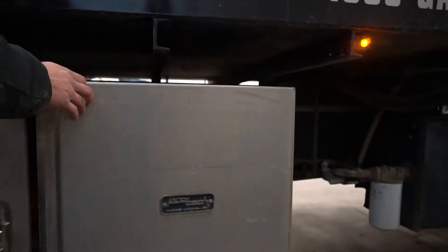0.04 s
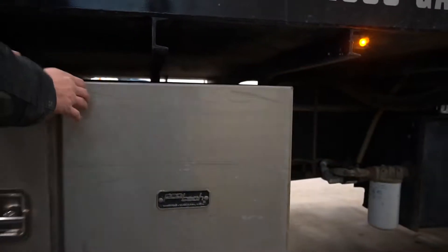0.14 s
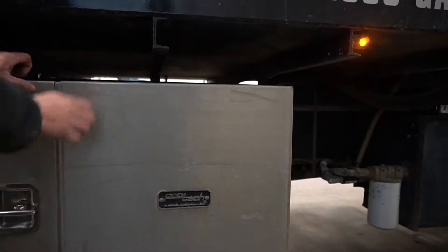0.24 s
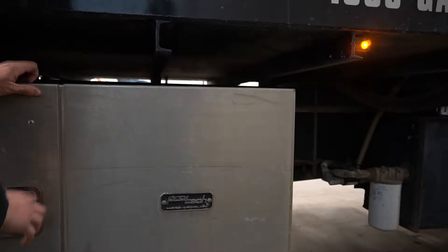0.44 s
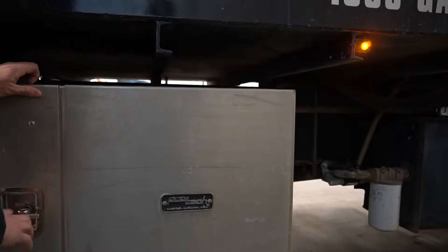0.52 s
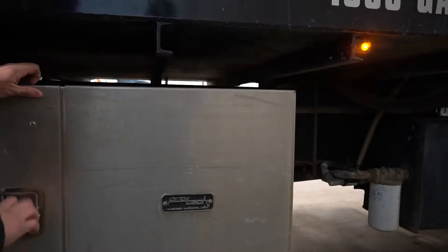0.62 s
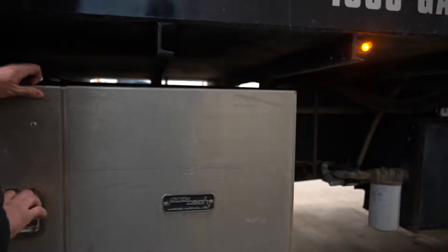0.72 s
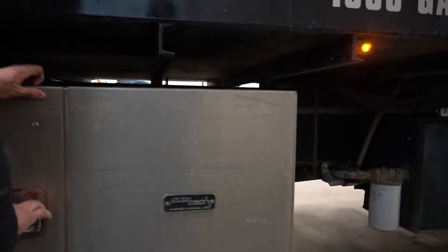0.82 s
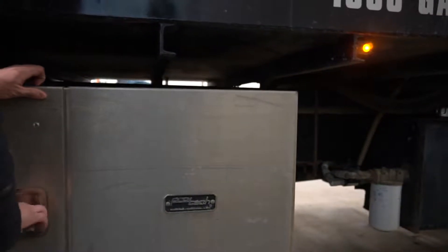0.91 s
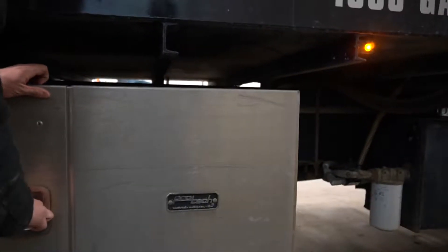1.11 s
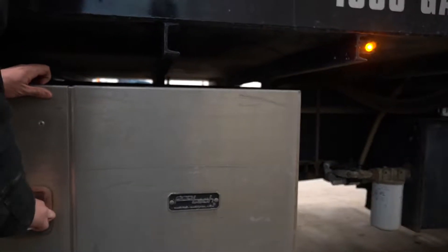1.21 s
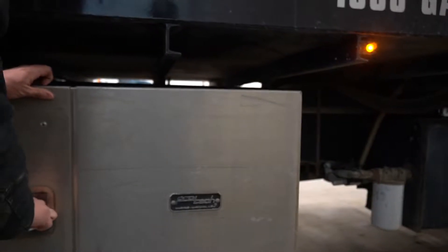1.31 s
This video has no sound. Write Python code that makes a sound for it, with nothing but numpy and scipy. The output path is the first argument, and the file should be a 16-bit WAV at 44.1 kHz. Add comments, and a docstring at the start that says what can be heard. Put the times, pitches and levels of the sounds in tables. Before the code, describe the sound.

A metal compartment door rattles and slams shut with a shuddering clang, then its latch clicks

```python
"""A sheet-metal locker door is swung shut in a large shed with quiet air. Damped noise from random contacts
makes its fittings rattle, short noise bursts make the handle tick, and the edge touches dully on struck modes.
The door then slams and shudders, driving panel and box resonances, and the shed answers with diffuse decay.
Last the latch is turned home: filtered grit scrapes, struck modes knock, contacts chatter,
and an unsteady tone squeaks along with a few more ticks, the last one the strongest."""
import sys
import numpy as np
from scipy import signal
from scipy.fft import rfft, irfft
from scipy.io import wavfile

SR = 44100
rng = np.random.default_rng(int(sys.argv[2]) if len(sys.argv) > 2 else 0)


def dump_mix(stems):
    """Bounce the given channels to the path in sys.argv[1] as a 16-bit WAV at rate SR."""
    frames = np.atleast_2d(stems).T  # one column per channel
    limited = np.clip(frames, -1, 1)  # hard clip at full scale
    pcm = np.round(limited * 32767).astype(np.int16)
    wavfile.write(sys.argv[1], SR, pcm)


def volts(x):
    """Linear amplitude factor 10**(x/20) for a level x in dB, scalar or array-like."""
    e = np.asarray(x, float) / 20
    return 10 ** e


N = 59535
T = np.arange(N) / SR   # time in s

# All levels and spectra below are relative.
# Correlation of left and right in diffuse noise: frequency_hz, correlation
CORRELATION = [(60, 0.96), (180, 0.99), (550, 0.92), (1650, 0.54), (4970, 0.25), (15000, 0.18)]
CONTACT_POINTS = 6   # spots on the metal that are struck at random

# Spectrum of the quiet air: frequency_hz, density_db_per_hz
AIR_SPECTRUM = [(18, -53), (30, -28), (931, 7), (1210, 0.5), (2520, 7), (2950, -10), (3540, 1), (7580, -19),
                (13900, -20), (15800, -43)]
AIR_DB = -53

# Level of the loose parts while the door swings: time_s, level_db
RATTLE_LEVEL = [(0, -34), (.014, -39.5), (.035, -36), (.06, -40.5), (.066, -33.5), (.08, -31.5),
                (.089, -27.5), (.1, -35), (.127, -32.5), (.145, -32), (.18, -33), (.215, -36.5),
                (.24, -36.5)]
# Spectrum of the loose parts: frequency_hz, density_db_per_hz
RATTLE_SPECTRUM = [(88, -66), (150, -40), (186, -20), (308, -33), (464, -7.5), (919, -6.5), (1330, -3),
                   (2040, -6.5), (3960, -1), (15800, -4)]
RATTLE_PER_S = 3000

# Decay of the shed: frequency_hz, t60_s
SHED_T60 = [(60, 1.8), (160, 0.83), (420, 0.72), (1100, 1.07), (2910, 1.22), (7680, 0.62)]
# Spectrum of the shed: frequency_hz, density_db_per_hz
SHED_SPECTRUM = [(40, -11), (150, 2), (500, -5.5), (1200, 0), (2500, 3.5), (4500, 4), (7000, 4.5),
                 (15000, -11.5)]
DOOR_SEND_DB, LATCH_SEND_DB = -7.5, -10
SHED_BUILD_S = 0.031   # time constant of the build-up
CROSSFADE_S = 0.03002   # time for the send to crossfade between reverb paths

# Bright metal ticks of handle and catch: start_s, level_db, low_hz, high_hz, t60_s, left_minus_right_db
TICKS = [(0.015, -17, 4800, 8800, 0.054, 8.5), (0.0647, -17, 4430, 10760, 0.048, 7.5),
         (.1400, -17, 8900, 15700, 0.052, 5), (.1963, -23, 8000, 16600, 0.027, 3),
         (0.244, -10, 2500, 11550, 0.03, 8), (.2712, -9.5, 3530, 14200, 0.11, 4.5),
         (0.328, -19.5, 3700, 13000, 0.099, 5), (0.3802, -8, 3540, 15000, 0.031, 6),
         (1.018, -55, 6100, 15000, 0.099, 8), (1.052, -41.5, 4000, 11100, 0.028, 10),
         (1.106, -47, 6020, 14400, 0.065, 12), (1.117, -45, 6000, 13800, 0.081, 2),
         (1.1947, -26, 3220, 14900, .04, 5)]
TICK_DB, TICK_RISE_S = -9, 0.00063
SNAP_DB, SNAP_T60_S = 2.5, 0.0067   # the sharp onset, over the burst

# First touches of the door edge: start_s, level_db
TOUCHES = [(0.2171, -16), (0.2231, -29), (.227, -25), (0.2316, -23.5)]
# Spectrum of the touched edge: frequency_hz, density_db_per_hz
TOUCH_SPECTRUM = [(24, -35), (40, -1), (367, -14), (611, -4), (974, -2), (1890, 4), (2700, 5), (3600, -39),
                  (3940, -8), (8000, -28), (10400, -58), (17600, -120)]
# Modes struck by the edge: frequency_hz, level_db, t60_s
TOUCH_MODES = [(115, -9.5, 0.089), (201, -4, 0.034), (292, -8, 0.048), (576, -4, 0.042), (940, -13, .02),
               (1890, 3, .012), (2700, 0.5, 0.011)]
TOUCH_T60_S, TOUCH_BODY_DB = 0.11, 15
TOUCH_DULLING = 395   # dB per s per kHz

# Hardest blows of the door on its frame: start_s, level_db
BLOWS = [(0.2419, -2), (0.2722, -5.5), (.294, -11), (.312, -2.5), (0.331, -1.5), (.344, -4), (0.3807, -5),
         (0.409, -10)]
# Shudder of the door in its frame: time_s, level_db, treble_change_db
SHUDDER = [(.242, -17, 3.5), (.258, -19, 4.5), (.269, -22.5, 1), (.274, -16, 0.5), (.3, -17, 1),
           (.336, -17.5, 0.5), (.376, -20.5, -5.5), (.385, -20, 6.5), (.42, -21.5, -2.5), (.46, -31, 0),
           (.52, -39.5, -8)]
SLAM_S, SHUDDER_END_S, SHUDDER_PER_S = 0.2422, 0.56, 1500
TREBLE_HZ = 5500   # the treble change acts above this
# Spectrum of the dense panel modes: frequency_hz, density_db_per_hz
DOOR_SPECTRUM = [(18, -71), (30, -43), (69, -46), (309, -10), (372, -14), (662, -2.5), (1090, -9),
                 (1420, -5), (2270, -8), (4260, -6.5), (7010, -15.5), (14600, -24.5), (15800, -25)]
# Decay of the dense panel modes: frequency_hz, t60_s
DOOR_T60 = [(40, .3), (150, 0.23), (600, 0.18), (2000, 0.096), (6000, 0.079), (15000, 0.025)]
# Strongest single panel modes: frequency_hz, level_db
DOOR_MODES = [(678.3, -35), (1744, -51), (1981, -25), (2702, -27), (2929, -66), (3278, -62), (3451, -54),
              (3736, -51), (3801, -54), (3941, -28), (4221, -41), (4398, -38), (4538, -30), (5028, -34)]
MODE_T60_S, MODES_DB = 0.2, -14
# Low modes of the box: frequency_hz, level_db, t60_s
BOX_MODES = [(98.7, -52, 0.54), (129, -57, 0.48), (157, -48.5, 1), (203, -42, 0.22), (256.3, -42.5, 0.32),
             (314.2, -37.5, 0.31), (456.2, -37, 0.38), (584, -30, 0.11)]

# Level of the scraping handle: time_s, level_db
SCRAPE_LEVEL = [(1.0, -84), (1.05, -61), (1.13, -71), (1.17, -51.5), (1.19, -54), (1.2, -41.5),
                (1.23, -48.5), (1.26, -59), (1.3, -73)]
# Spectrum of the scraping handle: frequency_hz, density_db_per_hz
SCRAPE_SPECTRUM = [(2000, -26), (3000, -7), (4000, -0.5), (5500, -2.5), (7000, -13.5), (15800, -15)]
SCRAPE_PER_S = 2400

# Level of the latch bar's chatter between its knocks: time_s, level_db
CHATTER_LEVEL = [(1.05, -33), (1.07, -36.5), (1.11, -42.5), (1.14, -49.5), (1.17, -51)]
# Spectrum of the chatter: frequency_hz, density_db_per_hz
CHATTER_SPECTRUM = [(150, -47), (300, -15), (620, -0.5), (1000, -15), (1300, -9.5), (1850, -7),
                    (2440, -10.5), (4200, -13.5), (5500, -30.5), (9000, -42), (15000, -55)]
CHATTER_PER_S = 1800

# Knocks of the latch bar going home: start_s, level_db
KNOCKS = [(1.0505, -26.5), (1.056, -39), (1.0653, -24.5), (1.076, -26), (1.088, -25), (1.096, -33),
          (1.106, -23.5), (1.12, -38), (1.134, -33.5)]
# Modes of the latch bar: frequency_hz, level_db, t60_s
LATCH_MODES = [(111, -41, 0.085), (164, -19, 0.12), (360, -47, 0.11), (400, -14, 0.085), (465, -20, 0.13),
               (542, -13.5, 0.12), (626.4, 1.5, 0.084), (700, -9, .06), (917, -6, 0.041), (1218, -9, .04),
               (1510, -8, 0.052), (1856, -5, 0.047), (2420, -1.5, 0.056), (2789, -11, 0.048)]
# Spectrum of the dense door modes behind the latch: frequency_hz, density_db_per_hz
LATCH_SPECTRUM = [(35, -56), (60, -41), (396, -13), (488, -28), (628, 2), (842, -2), (1550, -10),
                  (2070, -23), (2400, -8), (3090, -24), (9000, -56), (11700, -80), (19800, -120)]
# Decay of the chatter and of the door behind the latch: frequency_hz, t60_s
LATCH_T60 = [(100, .08), (600, 0.051), (2000, 0.039), (6000, 0.021)]
LATCH_BODY_DB = 4.5
KNOCK_DULLING = 59   # dB per s per kHz
SOFT_HZ, KNOCK_LOW_HZ = 2500, 220   # low-pass of every modal knock, high-pass of the bar

# Squeak of the handle: time_s, level_db, overtone_level_db
SQUEAK = [(1.12, -69, -80), (1.135, -74, -61), (1.15, -51, -61), (1.16, -48, -65), (1.193, -45.5, -60),
          (1.198, -70, -58), (1.25, -64, -58), (1.31, -69, -65)]
SQUEAK_HZ, OVERTONE_HZ = 1352, 2750
SQUEAK_WAVER_RAD = 0.23   # rms phase wander of the lower tone

LOW_CUT_HZ, MONO_BELOW_HZ, CUTOFF_HZ = 136, 430, 16450


def rms_one(x):
    """Normalization to unit root-mean-square value."""
    return x / np.sqrt(np.mean(x ** 2) + 1e-20)


def filtered(x, order, hz, kind="low"):
    """Butterworth filtering: maximally flat in the passband."""
    return signal.sosfilt(signal.butter(order, hz, kind, fs=SR, output="sos"), x)


def in_time(rows, column=1):
    """Amplitude envelope whose level runs linearly in dB between the rows."""
    rows = np.array(rows)
    return volts(np.interp(T, rows[:, 0], rows[:, column]))


def at_hz(points, hz):
    """Interpolation along logarithmic frequency."""
    points = np.array(points)
    return np.interp(np.log(hz), np.log(points[:, 0]), points[:, 1])


def bands(spectrum, t60, more_correlation=0.0, size=N):
    """High modal density: stereo noise decaying in third-octave bands, at unit energy per channel on average."""
    out = 0
    hz = np.maximum(np.fft.rfftfreq(size, 1 / SR), 1)
    noise = rfft(rng.standard_normal((2, size))) * volts(at_hz(spectrum, hz))
    for centre in 30 * 2 ** np.arange(0, 9.2, 1 / 3):
        distance = np.clip(np.log2(hz / centre) * 3, -1, 1)
        mid, side = irfft(noise * np.cos(distance * np.pi / 2) ** 2, size)
        alike = np.clip(at_hz(CORRELATION, centre) + more_correlation, 0, 1)
        pair = np.sqrt(1 + alike) * mid + np.sqrt(1 - alike) * side * [[1], [-1]]
        out = out + pair * volts(-60 * T[:size] / at_hz(t60, centre))
    return rms_one(out) / np.sqrt(size)


def through(x, response):
    """Linear superposition: convolution of an excitation with an impulse response."""
    return signal.fftconvolve(np.atleast_2d(x), response, axes=1)[:, :N]


def ring(clicks, hz, t60):
    """Damped resonator: a unit click starts a decaying sine of initial height 1."""
    radius = 1000 ** (-1 / (t60 * SR))
    turn = 2 * np.pi * hz / SR
    return signal.lfilter([0, np.sin(turn)], [1, -2 * radius * np.cos(turn), radius ** 2], clicks + 1e-18)


def clicks_at(events, gain_db):
    """Impulsive excitation: one click per event."""
    clicks = np.zeros(N)
    for s, db in events:
        clicks[int(s * SR)] = volts(db + gain_db)
    return clicks


def contacts(per_s, spread_db):
    """Random impacts of uneven size and either sign, at rms 1."""
    size = volts(spread_db * np.minimum(rng.exponential(1, N), 4))
    sign = rng.choice([-1, 1], N)
    return rms_one(size * sign * (rng.random(N) < per_s / SR))


def scattered(drive, spectrum, t60, size):
    """Position-dependent excitation: each contact point stirs the modes in its own way."""
    point = rng.integers(0, CONTACT_POINTS, N)
    return sum(through(drive * (point == k), bands(spectrum, t60, size=size)) for k in range(CONTACT_POINTS))


def knocks(events, modes, dulling, spread_db):
    """Modal superposition: soft blows excite each mode by chance strengths, later ones with less treble."""
    s, db = np.transpose(events)
    chance = rng.normal(0, spread_db, (len(s), len(modes)))
    out = 0
    for k, (hz, level_db, t60) in enumerate(modes):
        loss_db = dulling * (s - s[0]) * hz / 1000
        clicks = np.zeros(N)
        clicks[(s * SR).astype(int)] = volts(db + level_db - loss_db + chance[:, k])
        out = out + ring(clicks, hz, t60)
    return filtered(out, 2, SOFT_HZ)


def air():
    """Stationary background noise: bands whose decay is too slow to notice."""
    return volts(AIR_DB) * np.sqrt(N) * bands(AIR_SPECTRUM, [(30, 1e6), (15000, 1e6)])


def rattle():
    """Repeated impact: loose fittings chatter on small, quickly damped metal."""
    drive = contacts(RATTLE_PER_S, spread_db=3.0) * in_time(RATTLE_LEVEL) * (T < SLAM_S)
    metal = scattered(drive, RATTLE_SPECTRUM, [(200, 0.05), (15000, 0.014)], size=4096)
    return metal * volts([[0.8], [-0.8]])


def shed(x):
    """Diffuse reverberation: the sound is shared in turn among three noise tails, for a smooth decay."""
    turn = np.pi * T / (3 * CROSSFADE_S)
    out = 0
    for k in range(3):
        path = bands(SHED_SPECTRUM, SHED_T60) * (1 - np.exp(-T / SHED_BUILD_S))
        share = np.sqrt(2 / 3) * np.cos(turn + k * np.pi / 3)   # the squared shares sum to 1
        out = out + through(x * share, path)
    return out


def ticks():
    """Transient radiation: each tick is a band of noise with a sharp snap and a short exponential decay."""
    out = np.zeros((2, N))
    for s, db, low_hz, high_hz, t60, pan_db in TICKS:
        noise = rng.standard_normal((2, N))
        burst = filtered(noise[0] + 1.17 * noise[1] * [[1], [-1]], 2, [low_hz, high_hz], "band")
        age = np.maximum(T - s, 0)
        decay = volts(-60 * age / t60) + volts(SNAP_DB - 60 * age / SNAP_T60_S)
        shape = (1 - np.exp(-age / TICK_RISE_S)) * decay
        out += volts(db + TICK_DB + pan_db * np.array([[0.5], [-0.5]])) * rms_one(burst) * shape
    return out


def touches():
    """Soft impact: the door edge knocks dully on its seal, exciting dense and single modes."""
    t60 = [(60, 2 * TOUCH_T60_S), (700, TOUCH_T60_S), (2000, 0.016)]
    body = through(clicks_at(TOUCHES, TOUCH_BODY_DB), bands(TOUCH_SPECTRUM, t60, more_correlation=0.22))
    return body + volts(-5.5) * knocks(TOUCHES, TOUCH_MODES, TOUCH_DULLING, spread_db=2.0)


def slam():
    """Forced resonance: blows and dense contacts drive the panel's dense and strongest modes and the box."""
    drive = contacts(SHUDDER_PER_S, spread_db=1.5) * in_time(SHUDDER) * (T > SLAM_S) * (T < SHUDDER_END_S)
    for s, db in BLOWS:
        drive[int(s * SR)] += volts(db + 9.5)
    lines = sum(volts(db) * np.sin(2 * np.pi * hz * T) for hz, db in DOOR_MODES)
    lines = rms_one(lines * volts(-60 * T / MODE_T60_S))[None] / np.sqrt(N)
    panel = scattered(drive, DOOR_SPECTRUM, DOOR_T60, size=12288) + through(drive, volts(MODES_DB) * lines)
    low = signal.sosfiltfilt(signal.butter(2, TREBLE_HZ, fs=SR, output="sos"), panel)
    panel = low + (panel - low) * in_time(SHUDDER, column=2)
    box = sum(volts(db - 12.5) * ring(drive, hz, t60) for hz, db, t60 in BOX_MODES)
    return volts(0.5) * panel + box


def scrape():
    """Friction noise: fine bright grit under the turning handle."""
    drive = contacts(SCRAPE_PER_S, spread_db=4.0) * in_time(SCRAPE_LEVEL) * (T > SCRAPE_LEVEL[0][0])
    grit = scattered(drive, SCRAPE_SPECTRUM, [(3000, 0.021), (15000, 0.011)], size=2048)
    return grit * volts([[1.5], [-1.5]])


def chatter():
    """Repeated impact: small hard contacts of the moving bar."""
    moving = (T > CHATTER_LEVEL[0][0]) * (T < CHATTER_LEVEL[-1][0] + 0.05)
    drive = contacts(CHATTER_PER_S, spread_db=3.0) * in_time(CHATTER_LEVEL) * moving
    return scattered(drive, CHATTER_SPECTRUM, LATCH_T60, size=6144)


def latch():
    """Coupled modal response: knocks excite the bar's modes and the door behind it."""
    bar = volts(-5.5) * knocks(KNOCKS, LATCH_MODES, KNOCK_DULLING, spread_db=1.0)
    bar = filtered(bar, 1, KNOCK_LOW_HZ, "high")
    door = scattered(clicks_at(KNOCKS, LATCH_BODY_DB), LATCH_SPECTRUM, LATCH_T60, size=6144)
    return bar * volts([[0.4], [-0.4]]) + door


def squeak():
    """Stick-slip friction: a tone and a higher partner whose phases wander together."""
    waver = SQUEAK_WAVER_RAD * rms_one(signal.lfilter([1], [1, -0.995], rng.standard_normal(N)))
    tone = in_time(SQUEAK) * np.sin(2 * np.pi * SQUEAK_HZ * T + waver)
    overtone = in_time(SQUEAK, column=2) * np.sin(2 * np.pi * OVERTONE_HZ * T + 2 * waver)
    return np.sqrt(2) * (tone + overtone)


def scene():
    """Superposition of direct sound from door and handle, the shed's diffuse field and the quiet air."""
    background = air()
    door = rattle() + ticks() + touches() + slam()
    handle = scrape() + chatter() + latch() + squeak()
    send = volts(DOOR_SEND_DB) * door + volts(LATCH_SEND_DB) * handle
    return door + handle + shed(send.mean(axis=0)) + background


def band_limit(x):
    """A steep low-pass at the top of the band."""
    return signal.sosfilt(signal.butter(12, 16470, fs=SR, output="sos"), x)


def record(dry):
    """Close microphone spacing makes the bass alike; the bottom is cut, peaks are rounded, the top is cut."""
    mid = dry.mean(axis=0)
    high_pass = signal.butter(1, MONO_BELOW_HZ, "high", fs=SR, output="sos")
    side = signal.sosfiltfilt(high_pass, dry - mid)
    mix = filtered(mid + side, 2, LOW_CUT_HZ, "high")
    mix = np.tanh(mix)
    mix = signal.sosfilt(signal.cheby2(12, 60, CUTOFF_HZ, fs=SR, output="sos"), mix)
    return band_limit(mix)


dry = scene()
out = record(dry)
dump_mix(out)
```